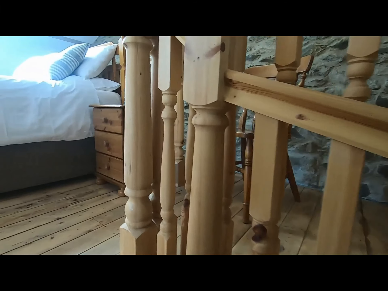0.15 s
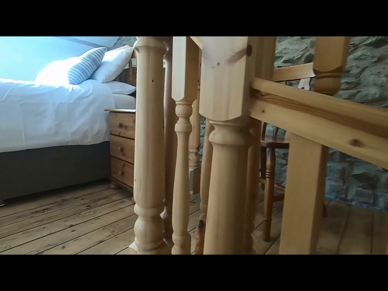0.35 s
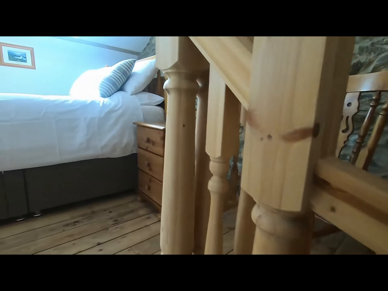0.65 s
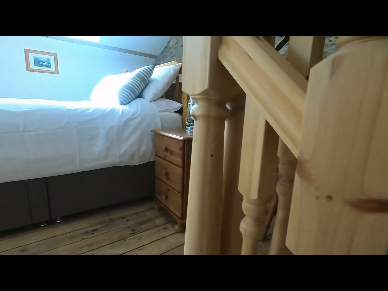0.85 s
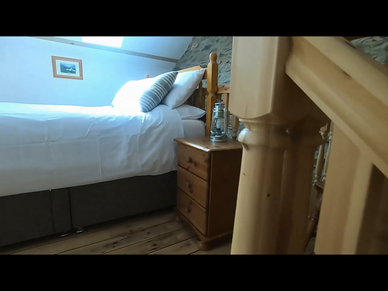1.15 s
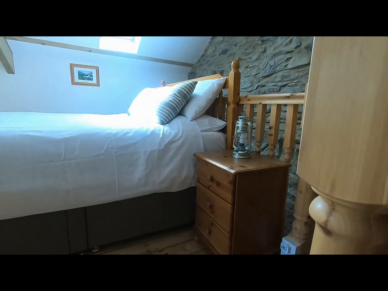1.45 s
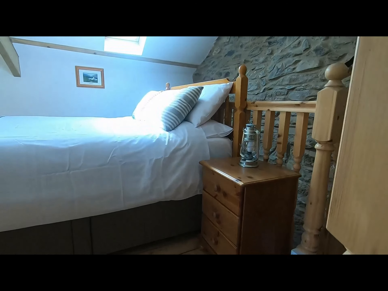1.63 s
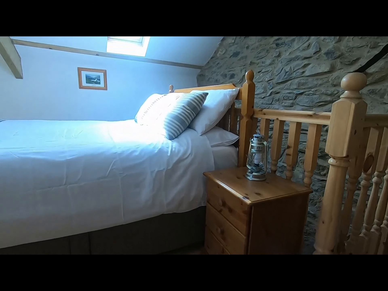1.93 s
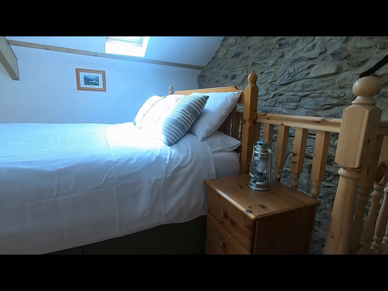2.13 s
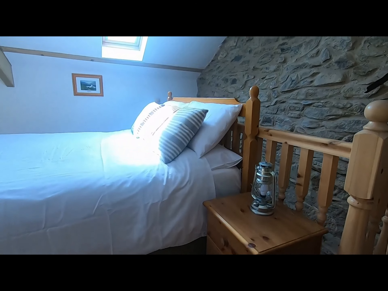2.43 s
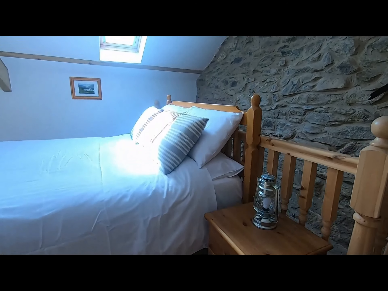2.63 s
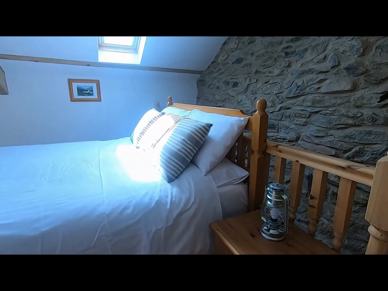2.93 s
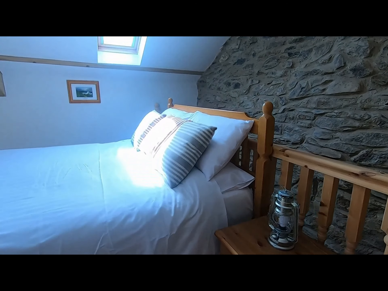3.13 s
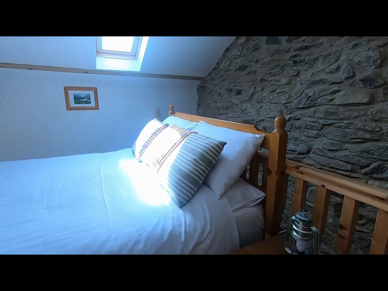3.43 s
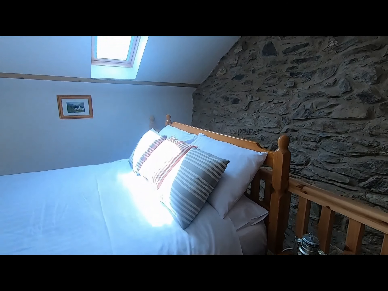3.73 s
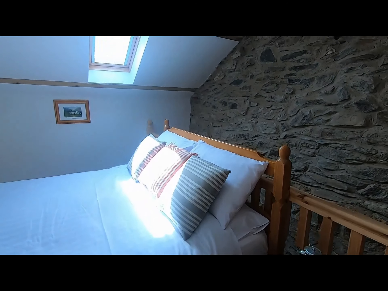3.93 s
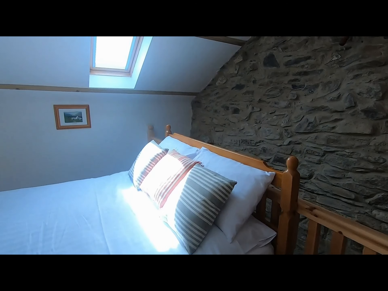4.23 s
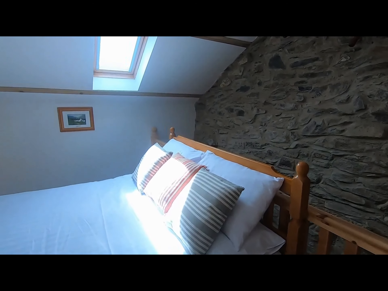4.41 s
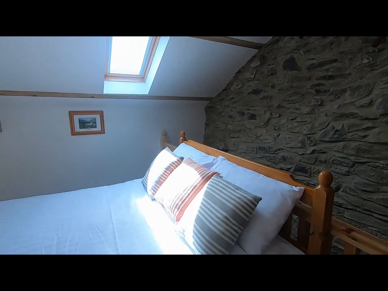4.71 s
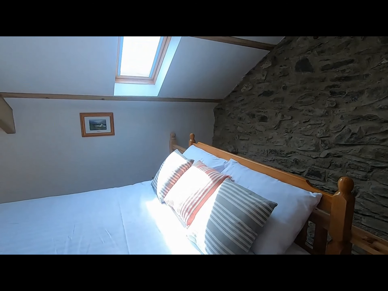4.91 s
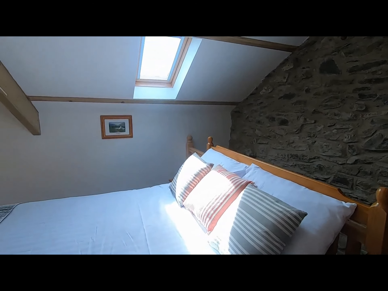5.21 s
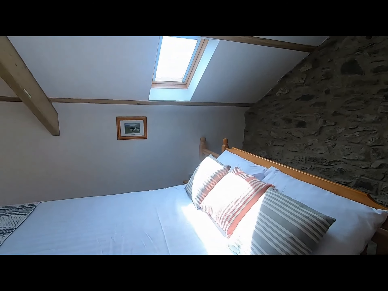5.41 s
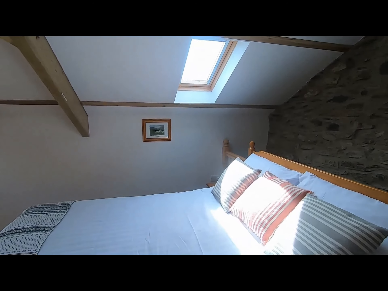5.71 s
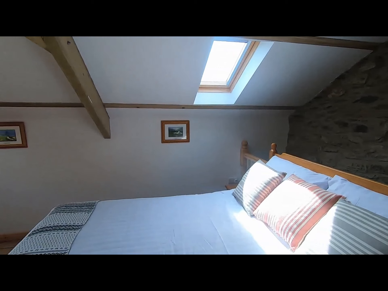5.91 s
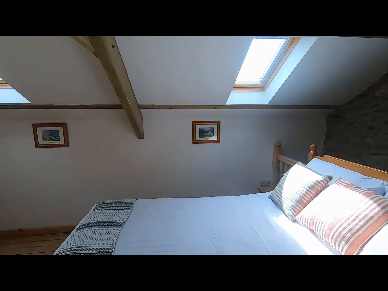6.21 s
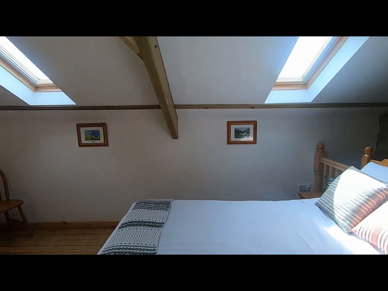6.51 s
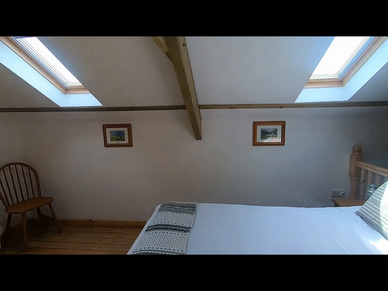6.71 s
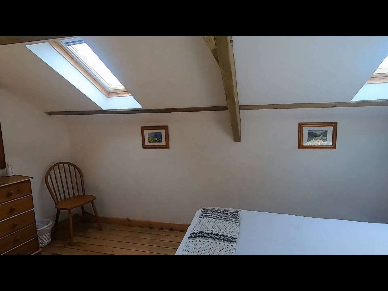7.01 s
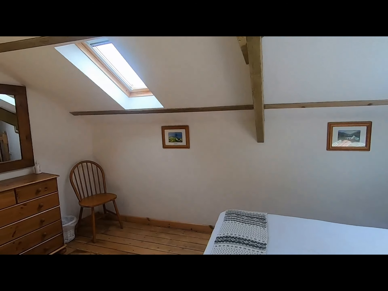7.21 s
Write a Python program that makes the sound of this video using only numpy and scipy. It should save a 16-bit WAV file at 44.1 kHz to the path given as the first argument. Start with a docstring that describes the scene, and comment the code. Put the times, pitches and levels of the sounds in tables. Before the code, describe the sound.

Someone climbs a wooden staircase with dull thuds and rustling clothes, then steps onto floorboards that crack and creak loudly.

```python
"""Someone climbs the last wooden stairs to an attic bedroom: soft footfalls thud in the timber, soles
scuff and the body's weight lands deep in the house. From about 3.5 s loose floorboards slip against
their nails in runs of sharp cracks, and a small hard room rings after each. The last steps and a few
faint slips come around 7 s. Throughout, clothes rustle with each stride and small ticks fall between,
over a low hush, heard through a handheld two-port microphone."""
import sys
import numpy as np
from scipy import signal
from scipy.fft import rfft, irfft, next_fast_len
from scipy.io import wavfile
from scipy.ndimage import uniform_filter1d

SR = 44100
rng = np.random.default_rng(int(sys.argv[2]) if len(sys.argv) > 2 else 0)


def bounce(signal):
    """Save signal as a 16-bit WAV file at the path given by the first command-line argument."""
    frames = np.transpose(np.atleast_2d(signal))
    limited = np.clip(frames, -1, 1)
    pcm = np.round(limited * 32767).astype(np.int16)
    wavfile.write(sys.argv[1], SR, pcm)


N = 324119
SIZE = 3 * 2 ** 13  # samples in one hit
T = np.arange(SIZE) / SR
HZ = np.maximum(np.arange(SIZE // 2 + 1) * SR / SIZE, 1.)
SIDES = np.array([[1.], [-1.]])  # left, right


def undb(db):
    """Gain of a level in dB."""
    return 10 ** (np.asarray(db) / 20)


def curve(table, hz):
    """Value of a breakpoint curve on a log frequency axis."""
    return np.interp(np.log(hz), np.log(np.array(table)[:, 0]), np.array(table)[:, 1])


def peak(hz, width_hz):
    """Gain curve of one resonance."""
    return 1 / np.sqrt(1 + ((HZ - hz ** 2 / HZ) / width_hz) ** 2)


def causal(gain):
    """Minimum-phase response of a gain curve, by folding the cepstrum."""
    cepstrum = irfft(np.log(gain + 1e-9))
    cepstrum[1:SIZE // 2] *= 2
    cepstrum[SIZE // 2 + 1:] = 0
    return np.exp(rfft(cepstrum))


def fade(t60_s):
    """Exponential decay, 60 dB down at t60_s."""
    return np.exp(-np.log(1000) * T / t60_s)


def flicker(rate_hz):
    """Glides between random values; spread near 1."""
    hold = int(SR / rate_hz)
    return uniform_filter1d(np.repeat(rng.standard_normal(N // hold + 1), hold), hold)[:N]


# Stereo width: freq_hz, side_minus_mid_db
WIDTH = [(60, -24), (250, -24), (500, -11), (900, 0), (14000, 0)]
def port_noise(size):
    """Noise spectrum at two close microphone ports: alike in the bass, unrelated in the treble."""
    mid, side = rfft(rng.standard_normal((2, size)))
    hz = np.maximum(np.arange(len(mid)) * SR / size, 1.)
    share = undb(curve(WIDTH, hz))
    return (mid + SIDES * share * side) / np.sqrt(1 + share ** 2)


# Pan of the walker's body: time_s, left_minus_right_db
BODY_PAN = [(0, -4.5), (2.3, -5), (3.3, -2.5), (4.5, -1), (7.4, -1.5)]
def pan(time_s):
    """Gains of the two ports: the walker sits to the right until the microphone turns."""
    return undb(SIDES * np.interp(time_s, *np.transpose(BODY_PAN)) / 2)


# The left port hears the feet later until the microphone turns: time_s, lag_ms
PORT_LAG = [(0, .23), (3.3, .23), (3.5, .1), (4.5, .1), (5, -.04), (7.4, -.04)]
def place(track, start_s, spectrum, level_db, rise_s, rms_span_s=0):
    """Lay a hit on the track, later at one port; level_db is its peak, or its rms over rms_span_s."""
    lag_s = np.interp(start_s, *np.transpose(PORT_LAG)) / 1000
    hit = irfft(spectrum * np.exp(-1j * np.pi * HZ * (SIDES * lag_s + .0005)))
    hit *= 1 - np.exp(-(T / rise_s) ** 2)
    hit *= np.clip((T[-1] - T) / .2, 0, 1)
    size = np.std(hit[:, T < rms_span_s]) if rms_span_s else np.abs(hit.mean(0)).max()
    start = int(start_s * SR)
    track[:, start:start + SIZE] += (hit * undb(level_db) / size)[:, :N - start]


def stairwell(t60_s, wet_db, build_s):
    """Response to a dull blow: the direct sound, then one diffuse decay."""
    out = irfft(port_noise(SIZE)) * fade(t60_s) * (1 - np.exp(-T / build_s)) * undb(wet_db)
    out[:, 0] += 1
    return rfft(out)


# Reverb time of the bedroom: freq_hz, t60_s
BEDROOM_DECAY = [(60, 0.063), (250, 0.65), (1000, 0.55), (3000, 0.55), (7000, 0.52), (13000, 0.42)]
def bedroom(decay_scale, wet_db, build_s, crack_db, crack_s, direct_db, direct_delay_s):
    """Response to a click: a dense bright burst, then reflections that fade octave by octave."""
    noise, tail = port_noise(SIZE), 0
    for hz in 50 * 2. ** np.arange(9):
        band = np.cos(np.pi / 2 * np.clip(np.log2(HZ / hz), -1, 1)) ** 2
        tail = tail + irfft(noise * band) * fade(decay_scale * curve(BEDROOM_DECAY, hz))
    burst = undb(crack_db) * np.exp(-T / crack_s) * irfft(noise * peak(3940, 4600))
    out = (tail * (1 - np.exp(-T / build_s)) + burst) * undb(wet_db)
    out[:, int(direct_delay_s * SR)] += undb(direct_db)
    return rfft(out)


def noise_bed(eq, flicker_db, tilt_db=0.):
    """Wide noise bands that flicker separately, tilted per octave about 4 kHz; rms near 1 untilted."""
    size = next_fast_len(N)
    hz = np.maximum(np.arange(size // 2 + 1) * SR / size, 1.)
    noise = port_noise(size) * undb(curve(eq, hz))
    noise /= np.std(irfft(noise[0], size))
    out = 0
    for octave in np.arange(-7.5, 3.5, 1.5):
        band = np.cos(np.pi / 2 * np.clip((np.log2(hz / 4000) - octave) / 1.5, -1, 1)) ** 2
        out = out + irfft(noise * band, size)[:, :N] * undb(flicker_db * flicker(8.6) + octave * tilt_db)
    return out


# Room tone EQ: freq_hz, level_db
HUSH_EQ = [(15, -24.5), (35, -5), (90, -24), (160, 2), (275, -9), (378, -6.5), (468, -8.5), (579, -13),
           (1510, -11), (1680, -9.5), (14500, -30.5)]
def hush():
    """The quiet house: dark, nearly steady room tone."""
    return undb(-68.5) * noise_bed(HUSH_EQ, flicker_db=0.33)


# Cloth EQ: freq_hz, level_db
CLOTH_EQ = [(290, -44.5), (500, -10), (1070, -5), (1570, 0), (1800, -4), (2230, -1.5), (3210, -4),
            (4140, -2.5), (11900, -19), (14500, -35.5)]
# Cloth rubs: start_s, peak_s, level_db, swell_db, tilt_db_per_octave
CLOTH_RUBS = [(-0.1, 0.0, -53, 3, -0.5), (0.208, 0.723, -56.5, 5, 0), (0.744, 0.867, -53, 1, 0),
              (0.917, 1.082, -58.5, -2, -1), (1.153, 1.354, -59, 2, -1.5), (1.44, 1.512, -52, 8, -0.5),
              (1.61, 1.902, -53.5, 6.5, 1.5), (2.14, 2.864, -56.5, 3.5, 0), (2.985, 3.243, -61.5, 8, -3),
              (3.8, 3.94, -65.5, 0.5, -2), (4.667, 4.879, -59, 9, -.5), (5.014, 5.315, -71, 0.5, -3),
              (6.05, 6.107, -59, 3.5, -1.5), (6.19, 6.545, -76.5, -7.5, -5), (6.592, 6.614, -55.5, 18, -5),
              (6.748, 6.815, -52.5, 4.5, -2), (6.985, 7.054, -56, 2.5, -2.5), (7.128, 7.34, -65, 0.5, 1.5)]
def rustle():
    """Cloth fibres catch and let go: grainy hiss that swells with each stride."""
    attack_db_per_s, release_db_per_s = 247, 86
    t, power, weighted_tilt = np.arange(N) / SR, 1e-14, 0
    for start_s, peak_s, level_db, swell_db, tilt_db in CLOTH_RUBS:
        envelope_db = np.interp(t, [start_s - 1, start_s, peak_s, peak_s + 1],
                                [-swell_db - attack_db_per_s, -swell_db, 0, -release_db_per_s])
        rub_power = undb(level_db + envelope_db) ** 2
        power += rub_power
        weighted_tilt += tilt_db * rub_power
    hiss = noise_bed(CLOTH_EQ, flicker_db=0.32, tilt_db=weighted_tilt / power)
    grain = undb(1.2 * flicker(200))
    return hiss * np.sqrt(power) * grain * pan(t)


# Resonances of a tick: pitch_hz, width_hz
TICK_RESONANCES = [(1540, 260), (2200, 350), (3250, 400), (4200, 650), (5400, 1100)]
# Small dry ticks: start_s, level_db, pitch_hz, spread_hz
TICK_CUES = [(0.6725, -36.5, 4080, 1500), (2.123, -45, 2600, 1500), (2.379, -46.5, 2170, 1000),
             (2.524, -40, 4050, 3000), (3.376, -47.5, 1904, 1102), (3.906, -51, 2500, 800),
             (5.128, -44.5, 1700, 1200), (5.1969, -41, 4280, 700), (6.597, -46, 2000, 1200),
             (6.978, -35.5, 4170, 1990)]
def ticks():
    """A click rings a few short resonances, those near its pitch the hardest; close and nearly dry."""
    out = np.zeros((2, N))
    space = bedroom(decay_scale=0.78, wet_db=-38, build_s=0.015, crack_db=4.8, crack_s=0.0022,
                    direct_db=0, direct_delay_s=0)
    for start_s, level_db, pitch_hz, spread_hz in TICK_CUES:
        ring = sum(causal(peak(hz, width_hz) ** 2) / (1 + (2 * (hz - pitch_hz) / spread_hz) ** 2)
                   for hz, width_hz in TICK_RESONANCES)
        place(out, start_s, space * ring * pan(start_s) ** 1.6, level_db, rise_s=.0007)
    return out


# Sole scuffs: start_s, level_db
SCUFF_CUES = [(0.193, -53.5), (0.263, -50.5), (0.753, -47.5), (0.778, -40.5), (1.212, -45.5), (1.499, -51),
              (2.12, -49.5), (3.151, -48.5), (4.84, -49), (6.613, -56), (6.749, -47)]
def scuffs():
    """A sole brushes the tread: a short midrange scrape."""
    out, scrape = np.zeros((2, N)), causal(peak(2100, 1400) ** 2)
    for start_s, level_db in SCUFF_CUES:
        space = stairwell(t60_s=0.26, wet_db=-21, build_s=0.00089)
        place(out, start_s, space * scrape, level_db, rise_s=.004)
    return out


# Sub thumps: start_s, level_db
THUMP_CUES = [(0.256, -45), (1.27, -55.5), (2.104, -40.5), (3.162, -46.5), (4.345, -53), (6.712, -55.5)]
def thumps():
    """The body's weight lands deep in the frame of the house."""
    out, sub = np.zeros((2, N)), causal(peak(46, 40) ** 3)
    for start_s, level_db in THUMP_CUES:
        space = stairwell(t60_s=0.4, wet_db=-10.5, build_s=0.0021)
        place(out, start_s, space * sub, level_db, rise_s=.025)
    return out


# Modes of treads and floorboards: pitch_hz, t60_s, level_db
TIMBER_MODES = [(120.4, 0.34, 3.5), (168.1, 0.49, 2), (218.3, 0.39, -3), (269, 0.042, 4.5),
                (297.1, 0.24, -9), (398.4, 0.41, -4.5), (490.5, 0.08, 6), (560.6, 0.05, -6),
                (598, 0.16, -2), (668, 0.15, 1.5), (705.6, 0.26, -0.5), (1057, 0.08, 5), (1307, 0.13, 2.5),
                (1370, 0.11, 6.5), (1610, 0.3, -20.5)]
def timber(drive, scatter_db):
    """Free ringing of the wood; each blow lands elsewhere, so the mode levels scatter at random."""
    ring, unit_delay = 0, np.exp(-2j * np.pi * HZ / SR)
    for hz, t60_s, level_db in TIMBER_MODES:
        scatter, detune = rng.standard_normal(2)
        pole = np.exp(2j * np.pi * hz * (1 + .01 * detune) / SR - np.log(1000) / (t60_s * SR))
        gain = undb(level_db + scatter_db * scatter) * np.interp(hz, HZ, drive) * np.sign(detune)
        ring = ring + gain / (1 - pole * unit_delay)
    return ring / np.sqrt(SR)


# Heel and ball landings: start_s, level_db, pitch_hz, hardness_db, t60_s
FOOTFALL_CUES = [(0.191, -31, 158, 4.5, 0.19), (0.265, -24.5, 215, 8, 0.39),
                 (0.269, -34.5, 107.5, -25, 0.33), (0.534, -50.5, 194, -8, 0.87),
                 (0.755, -42, 240, 8.5, 0.09), (1.148, -30.5, 232, 0, 0.43), (1.21, -37.5, 220, 15, 0.35),
                 (1.421, -44.5, 183, -28, 0.68), (1.5, -51, 535, -15, 0.34), (2.101, -33.5, 328, 16, 0.31),
                 (2.119, -29.5, 242, 10.5, 0.62), (2.241, -38.5, 210, 11, 0.069),
                 (3.144, -46, 258.4, 17.5, 0.35), (3.152, -45, 696, -7, 0.34),
                 (3.162, -31.5, 210, -5.5, 0.43), (4.317, -41.5, 297, -13, 0.44),
                 (5.361, -59.5, 162, -27, 0.6), (6.613, -49.5, 236, -16, 1), (6.709, -41, 300, -11, 0.28),
                 (6.742, -39, 117, -36, 0.27), (7.061, -49, 220, -34.5, 0.33)]
def footfalls():
    """A soft push rings the timber near the step's pitch, and the heel adds a short knock."""
    out, upper_modes = np.zeros((2, N)), peak(445, 240) ** 2
    heel_eq, wood_eq = causal(peak(440, 590) ** 2.04), undb(5) * causal(peak(280, 170))
    for start_s, level_db, pitch_hz, hardness_db, t60_s in FOOTFALL_CUES:
        # a harder blow reaches the modes above the main one
        push = peak(pitch_hz, 0.5 * pitch_hz) ** 2.18 + undb(hardness_db - 18) * upper_modes
        thud = stairwell(t60_s, wet_db=-15.5, build_s=0.014) * causal(push)
        place(out, start_s, thud + wood_eq * timber(push, scatter_db=0.67), level_db, rise_s=.0018)
        heel = stairwell(t60_s=0.023, wet_db=-8.5, build_s=0.00087) * heel_eq
        place(out, start_s, heel, level_db + hardness_db - 15, rise_s=.0006)
    return out


# Crack EQ: freq_hz, level_db
CRACK_EQ = [(35, -67), (60, -43.5), (119, -23.5), (173, -1), (273, -2.5), (336, -6.5), (596, -13),
            (965, -10.5), (1710, -12), (1970, -13.5), (3300, -17.5), (5790, -25.5), (7200, -32),
            (11800, -43.5), (14500, -64.5)]
# The board underfoot: from_s, bass_db, joist_db, ring_db, ring_hz, width_hz, cavity_db, upper_hz,
# upper_db, knock_db, click_db, crack_db, crack_s
LOOSE_BOARDS = [(3.4, -11.5, -2.5, -12.5, 660, 109, 12.5, 1105, 2.5, 13, -2.5, 8.5, 0.004),
                (4.3, -11, -22, -13, 692, 149, 9.5, 1160, 3, 4.5, -15.5, 9.5, 0.0028),
                (5.5, -9, -47, -14, 613, 220, 12, 1737, 2, 9.5, -18, 4.5, 0.0076),
                (6.0, 0, -42, -32, 663, 150, 11, 1238, 12, -15, -14, 8, 0.0028)]
# Slips on a nail: start_s, level_db, treble_db
SLIP_CUES = [(3.453, -26, -2.5), (3.481, -26, -4), (3.508, -26, -22), (3.539, -25.5, -8),
             (3.579, -26.5, -12.5), (4.345, -23, -3.5), (5.602, -28, -17), (5.664, -25.5, -13),
             (5.723, -25, -12.5), (5.783, -25, -9.5), (5.841, -26.5, -8), (6.087, -52, 20),
             (6.596, -58, 24), (6.736, -50, 12), (6.981, -47, 9)]
def board_slips():
    """A loaded board slips on its nail: a hard click into the wood, the cavity below and the room."""
    out, crack_eq, previous_s = np.zeros((2, N)), undb(curve(CRACK_EQ, HZ)), 0
    treble, bass = 1 / (1 + (2500 / HZ) ** 2), 1 / (1 + (HZ / 400) ** 4)
    joist_boom = peak(106, 18) ** 2
    for start_s, level_db, treble_db in SLIP_CUES:
        board = [row for row in LOOSE_BOARDS if row[0] < start_s][-1]
        (_, bass_db, joist_db, ring_db, ring_hz, width_hz, cavity_db, upper_hz, upper_db,
         knock_db, click_db, crack_db, crack_s) = board
        if start_s - previous_s > .1:  # a new run; its slips share one place in the room
            hollow = peak(ring_hz, width_hz)
            drive = hollow ** 2.13 + undb(2.5) * peak(upper_hz, width_hz) ** 2
            wood = undb(ring_db + 13) * timber(drive, scatter_db=1.5)
            knock = undb(knock_db) * timber(peak(290.6, 90) ** 2, scatter_db=0.73)
            cavity = stairwell(t60_s=0.46, wet_db=-18, build_s=0.004) * causal(hollow ** 2)
            space = bedroom(decay_scale=0.83, wet_db=-17.5, build_s=0.01, crack_db=crack_db,
                            crack_s=crack_s, direct_db=click_db, direct_delay_s=0.0014)
            response = space + undb(cavity_db) * cavity + wood + knock
        previous_s = start_s
        tone_db = treble_db * treble + bass_db * bass + upper_db * peak(upper_hz, 250) ** 2
        colour = crack_eq * undb(tone_db) + undb(joist_db) * joist_boom
        balance = pan(start_s) ** (1 - bass)  # the bass stays centred
        place(out, start_s, response * causal(colour) * balance, level_db, rise_s=.00061, rms_span_s=.05)
    return out


def scene():
    """Feet, boards, ticks and clothes over the hush of the house."""
    return footfalls() + scuffs() + thumps() + board_slips() + ticks() + rustle() + hush()


def record(dry):
    """A steep high cut at 14.6 kHz."""
    return signal.sosfilt(signal.ellip(10, .2, 75, 14600, fs=SR, output="sos"), dry)


dry = scene()
out = record(dry)
bounce(out)
```